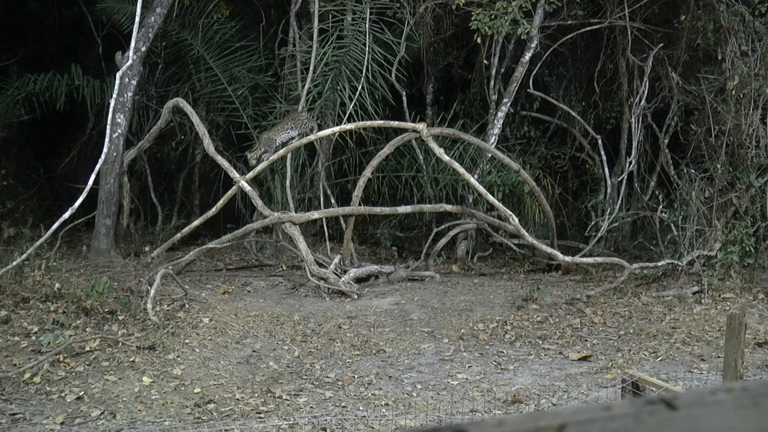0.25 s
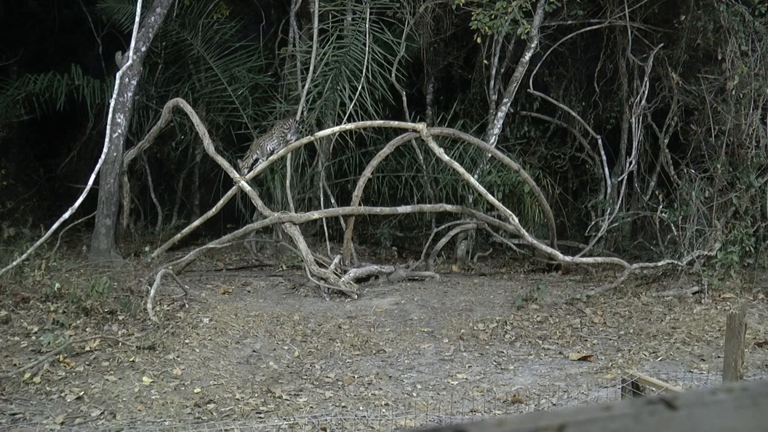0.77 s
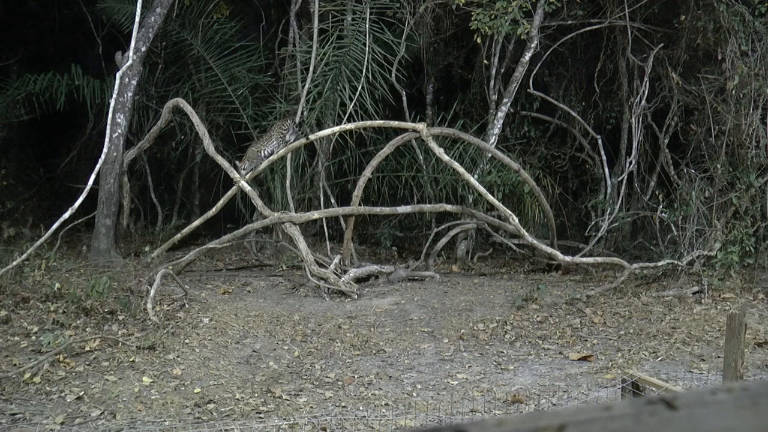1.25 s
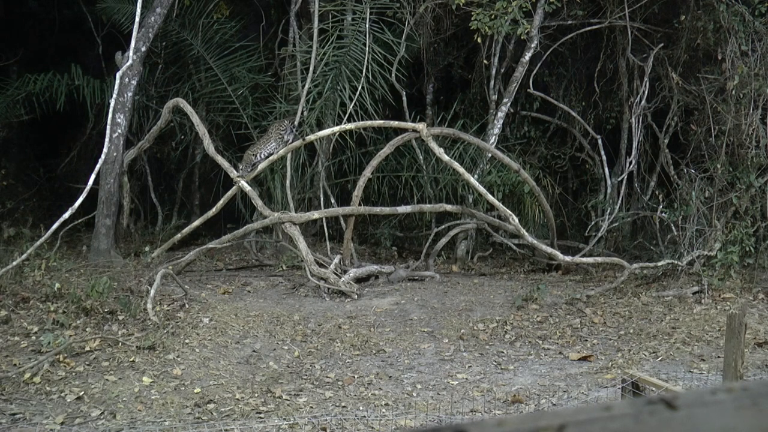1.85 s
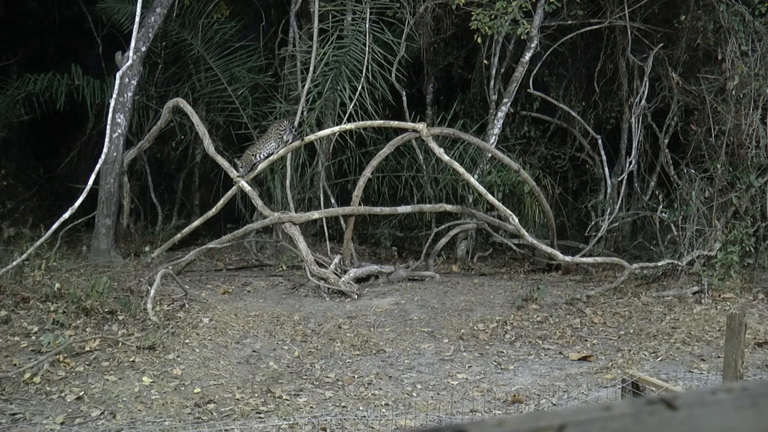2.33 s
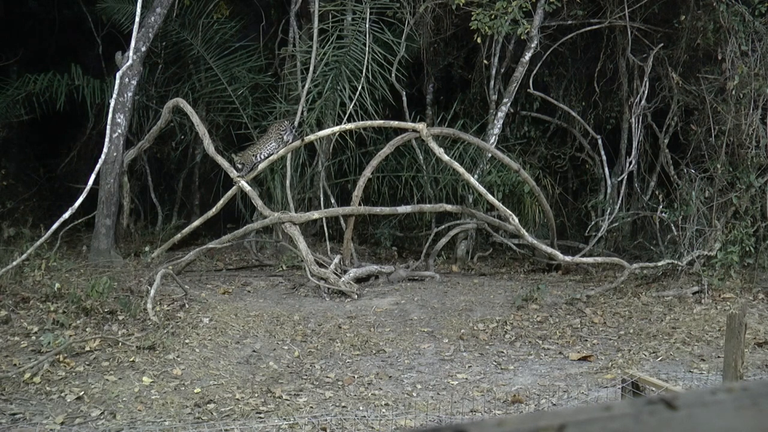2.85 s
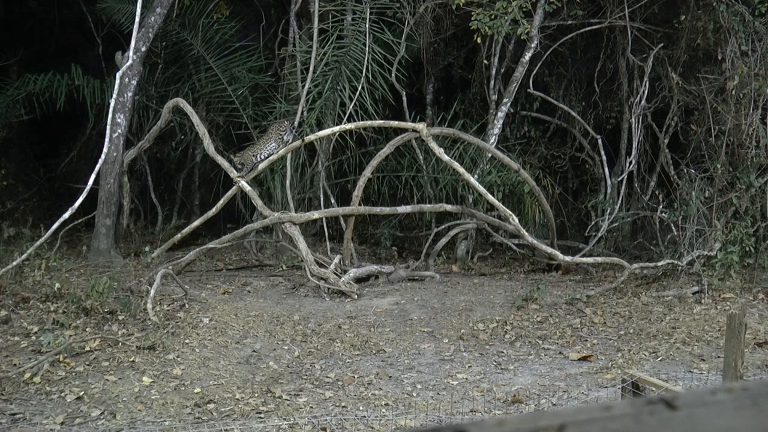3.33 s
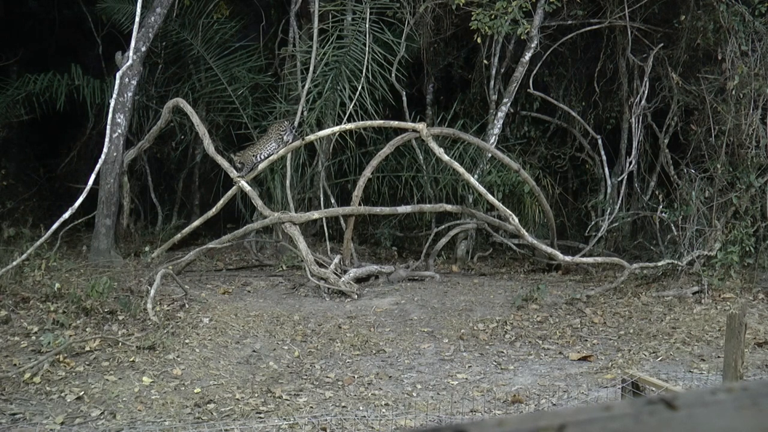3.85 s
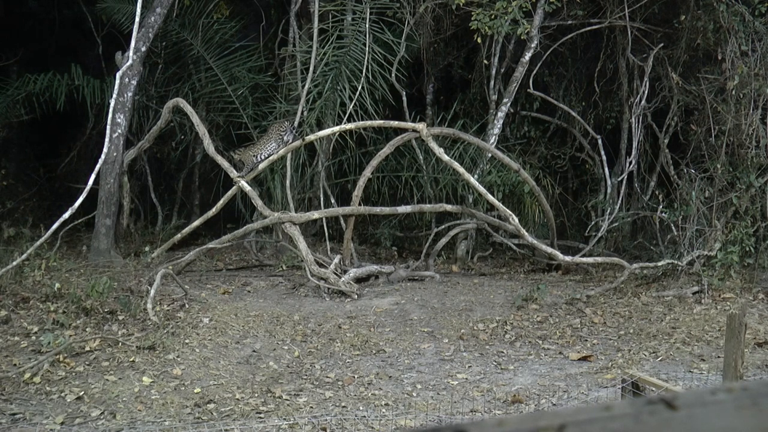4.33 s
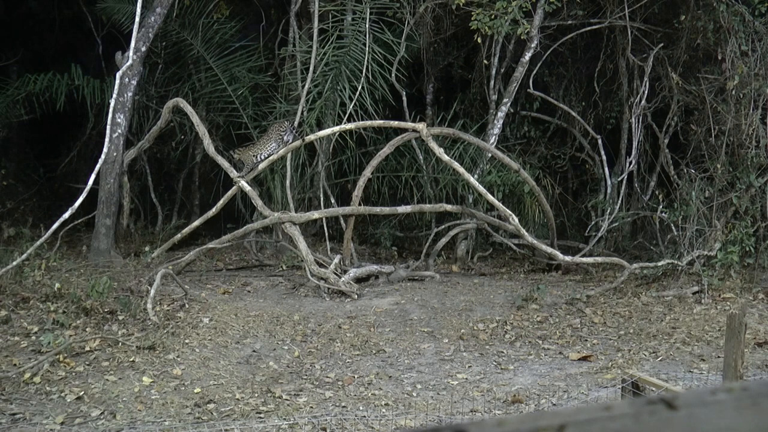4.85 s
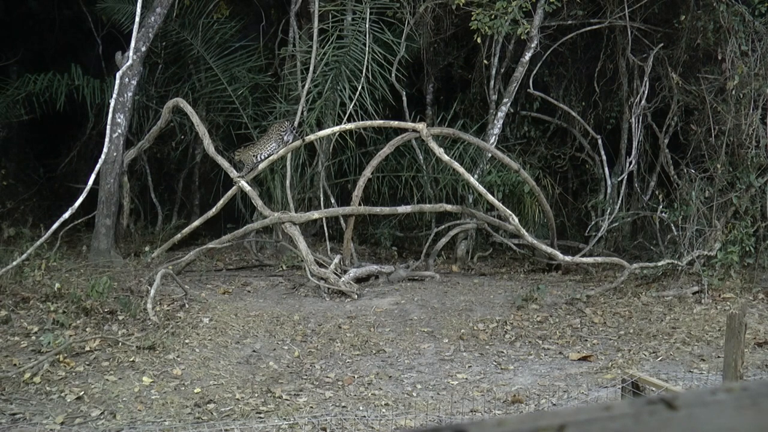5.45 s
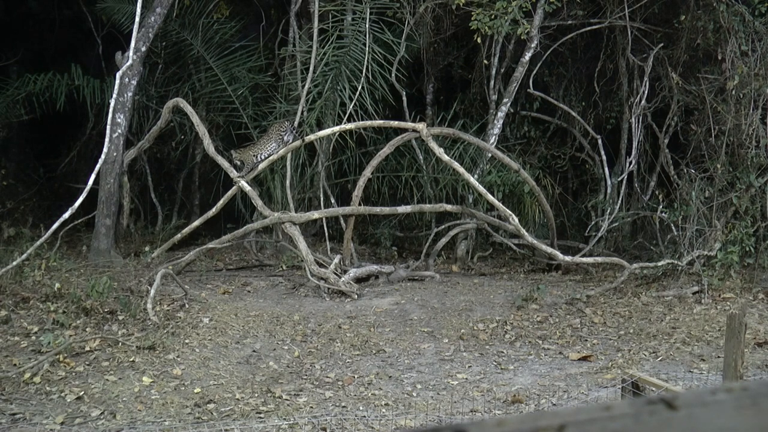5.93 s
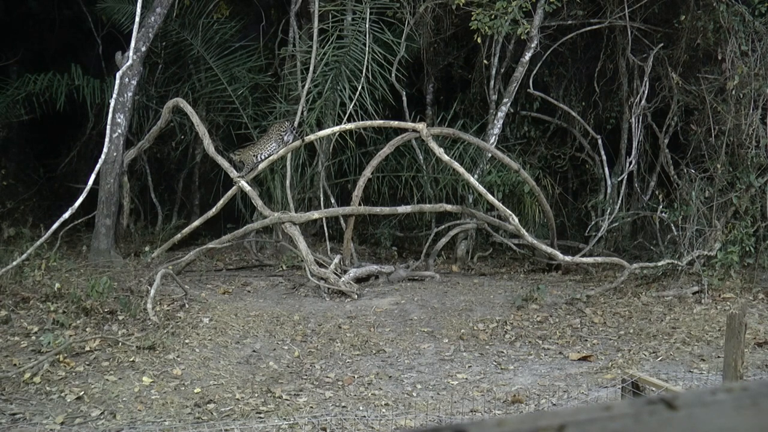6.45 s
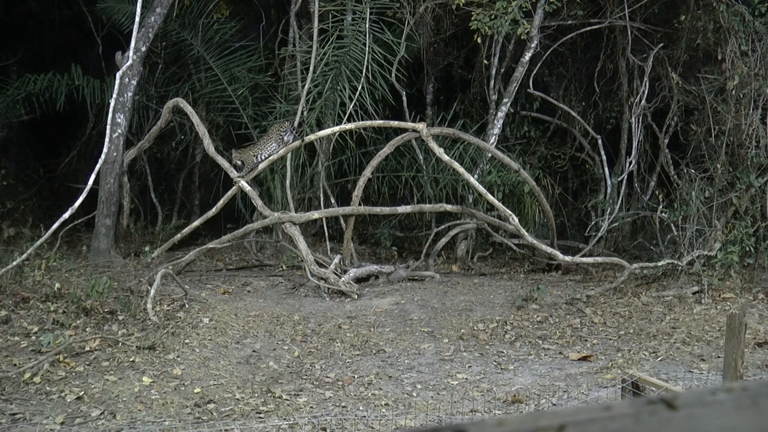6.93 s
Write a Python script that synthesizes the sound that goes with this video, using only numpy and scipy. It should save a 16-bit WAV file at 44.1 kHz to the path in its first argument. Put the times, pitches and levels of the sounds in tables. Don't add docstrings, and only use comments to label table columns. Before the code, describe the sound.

Night woodland heard from a handled camera. A continuous piercing cricket trill sits over a faint insect hum and soft air. Fabric rubs and light clicks open, a faint rising bird whistle follows, then the plastic case cracks sharply around three seconds. After four seconds come brief katydid buzzes, small scrapes and knocks; late on the bird whistles again and dull bumps accompany more cloth.

```python
import sys
import numpy as np
from scipy import signal
from scipy.io import wavfile
from scipy.ndimage import uniform_filter1d

SR = 44100
rng = np.random.default_rng(int(sys.argv[2]) if len(sys.argv) > 2 else 0)


def generate_wav(signal):
    frames = np.transpose(np.atleast_2d(signal))
    scaled = np.clip(frames, -1, 1) * 32767
    pcm = np.round(scaled).astype(np.int16)
    wavfile.write(sys.argv[1], SR, pcm)


def convert_level_to_amplitude(level_db):
    exponent = np.asarray(level_db, float) / 20
    return 10 ** exponent


N = 316638

# f/Hz, level/dB
AIR = [(12, -53), (20, -6), (43, -15), (87, -2.5), (180, -3), (300, 0.5), (499, -9.5), (721, -9),
       (831, -7.5), (902, -36), (1080, -13), (1270, -23), (1700, -11), (2400, -12), (2600, -21),
       (3380, -36), (5720, -120)]
HISS = [(1200, -34), (2200, -33), (3000, -5), (3700, -20), (5000, -1), (7400, -17), (8600, 12), (9020, 4),
        (9080, -14), (9230, -9), (9400, -5.5), (9600, -11.5), (9780, -12), (12000, -23), (16000, -18.5)]
# f/Hz, likeness (1 = same)
EAR_LIKENESS = [(60, 0.28), (130, 0.27), (290, 0.43), (640, 0.61), (1410, 0.5), (3100, 0.78), (6820, 1),
                (15000, 0.066)]
# t/s, lead/chirps
CRICKET_LEAD = [(0, 0.071), (.5, 0.089), (1, 0.12), (2, .18), (2.5, .17), (3.6, 0.089), (4, 0.11),
                (4.5, .16), (6.5, 0.16), (7.2, 0.2)]
# f/Hz, left/dB, right/dB, right ear's lead/rad
TRUNK_ECHOES = [(8063, -20, -19, -0.1), (8091, -19, -20, -0.2), (8122, -15, -15, -0.1),
                (8154, -15, -17, -0.3), (8211, -11, -14, -0.3), (8266, -17, -18, -0.7),
                (8293, -15, -13, -0.2), (8328, -10, -14, -0.4), (8349, -9, -16, 0.0), (8421, -4, -2, -0.2),
                (8452, -7, -7, -0.1), (8471, -8, -8, 0.0), (8500, -6, -6, -0.4), (8546, -4, -4, -0.1),
                (8581, -6, -10, 0.1), (8600, -3, -3, -0.3), (8663, -7, -7, -0.2), (8699, -11, -13, -0.9),
                (8729, -6, -8, 0.3), (8765, 3, 1, -1.0), (8800, -13, -10, -1.3), (8821, -4, -11, -1.4),
                (8847, -7, -8, -0.6), (8876, 2, -4, -0.6), (8901, 0, -4, -0.1), (8970, -9, -8, -0.6),
                (9006, -6, -8, -0.3), (9029, -13, -16, -0.3)]
# t/s, level/dB
SHIMMER_CHANGES = [(0.0, 1.5), (0.46, -7), (0.68, -3), (0.98, -6), (1.42, -5), (1.78, -4), (1.99, -4),
                   (3.0, -1), (3.1, 7), (3.17, -7), (3.3, -6), (4.06, -7), (5.56, -3), (6.28, -2.5), (6.66, -3)]
CHIRP_THROBS = [(1, .286, 1.0), (2, .27, -1.5), (3, .2, .15), (4, .13, -2.27), (6, .36, -.2),
                (10, .16, -1.6)]
# f/Hz, width/Hz, pulse rate/Hz, level/dB
CHORUS_VOICES = [(2628, 110, 83, -75.5), (2960, 220, 78, -65.5), (3056, 240, 57, -65), (3230, 52, 110, -68),
                 (3256, 82, 86, -66), (3317, 59, 40, -65), (3353, 160, 120, -66.5), (4550, 250, 70, -73.5),
                 (4890, 240, 110, -70), (6986, 190, 83, -76)]
# start/s, end/s, level/dB, brightness/dB
CLOTH_STROKES = [(0.05, 0.196, -65.5, -3), (0.264, 0.395, -67, 7.5), (0.79, 1.15, -68, -4),
                 (1.293, 1.46, -79, 7), (1.936, 2.192, -73, -4), (2.405, 2.667, -64.5, -3.5),
                 (2.732, 3.085, -66, -6.5), (3.303, 3.624, -61, -3.5), (4.05, 4.352, -89, 16),
                 (4.415, 4.62, -75, 8), (4.814, 5.413, -78, -5), (5.438, 5.657, -69.5, -3),
                 (5.735, 5.86, -66.5, 3), (5.838, 6.285, -81, -16.5), (6.237, 6.702, -72.5, -10),
                 (6.828, 7.002, -66.5, -4), (7.066, 7.302, -62, 1.5)]
# low/Hz, high/Hz, level/dB, share of brightness, side share
CLOTH_RANGES = [
    (120, 770, -5, -0.55, 0.49),
    (980, 3090, -2.5, -1, 0.32),
    (3750, 7550, 5, 0.67, 0.084),
    (9050, 13100, -6, 0.97, 1),
]
# t/s, peak/dB, f/Hz, t60/s (t60 = time to fade by 60 dB)
TAPS = [(.0654, -55, 2200, .012), (0.096, -57, 1440, 0.11), (.109, -50, 6500, .012),
        (2.0572, -41, 2520, .012), (2.977, -37, 1150, 0.014), (2.8972, -32, 2700, 0.006),
        (3.3355, -47, 1200, .015), (3.489, -53, 290, 0.044), (3.503, -50, 2300, .02),
        (3.552, -46, 290, .05), (3.553, -45.5, 1650, .03), (3.606, -50, 1700, .02), (3.607, -53, 2300, .02),
        (4.106, -54, 1950, .02), (4.262, -51.5, 1410, 0.036), (4.274, -50, 1780, 0.033),
        (4.345, -63, 2150, .02), (4.412, -57, 1900, .02), (4.598, -58, 2000, .02), (4.659, -54, 1970, .02),
        (2.114, -55, 1450, 0.066), (.1695, -44, 5250, .014), (2.8975, -33, 960, .012),
        (2.9765, -32, 900, .008), (2.9762, -22, 3300, .004), (5.396, -46, 5100, 0.017),
        (5.185, -46, 2600, 0.013), (5.788, -54, 12000, .01), (5.788, -62, 12800, .01),
        (5.799, -62, 14700, .01), (5.825, -54.5, 336, .06), (6.235, -56, 570, .05), (5.31, -59, 750, .06),
        (2.7045, -47, 1050, .02), (3.555, -51, 560, 0.047), (3.565, -55, 730, .04), (3.371, -50, 600, .03),
        (2.534, -64, 1600, .2), (2.9775, -28, 1660, 0.011),
        (.1455, -44, 4900, .01), (.159, -45, 5300, .012), (.0895, -50, 5600, .012),
         (.121, -48, 5200, .012), (.1685, -47, 2000, .012), (.123, -45, 2600, .02),
         (2.7035, -45, 2050, .012), (2.7035, -46, 760, .016), (2.909, -37, 400, .025),
         (2.909, -42, 900, .02), (2.928, -44, 290, .04), (3.371, -45, 1700, .014),
         (3.4386, -48, 1750, .014), (3.4386, -50, 2250, .014), (3.579, -43, 2500, .012),
         (3.335, -38, 260, .04), (3.384, -47, 230, .03), (4.259, -53, 810, .04), (4.316, -53, 640, .04),
         (5.29, -53, 1750, .03), (5.357, -57, 1750, .025), (5.398, -55, 1900, .025),
         (5.557, -55, 1080, .03), (5.557, -57, 1750, .025), (5.135, -55, 420, .05), (3.012, -47, 290, .04),
         (.2345, -56, 2000, .02)]
# t/s, peak/dB, f/Hz, t60/s
BUTTON_CLICK = [(.289, -33, 2450, .011), (.2905, -38, 4810, .009), (.2905, -39, 4020, .009),
                (.2905, -46, 6450, .008), (.29, -43, 8890, .006), (.289, -42, 1900, .01),
                (.297, -44, 7800, .008), (.2975, -48, 4300, .008), (.29, -60, 640, .015)]
# t/s, peak/dB, f/Hz, t60/s
CRACK = [(2.9736, -28, 2500, .004), (2.9761, -3.5, 2150, .0023), (2.9761, -26, 6300, .002),
         (2.976, -24, 310, .022), (2.9765, -29, 700, .012), (2.896, -23, 290, .03),
         (2.897, -30, 1640, .022), (2.7038, -41, 1400, .008), (3.333, -31, 720, .022),
         (3.334, -44, 205, .05)]
# t/s, peak/dB, f/Hz
BUMPS = [(1.368, -50.5, 300), (1.524, -53, 297), (1.635, -50, 270), (2.06, -47.5, 286),
         (2.7033, -35.5, 284), (2.8962, -34, 397), (2.998, -40.5, 285), (3.361, -45, 295),
         (3.521, -43.5, 300), (4.315, -41.5, 324), (6.59, -54.5, 355), (6.825, -38, 201), (6.905, -40, 167),
         (6.978, -38, 172), (7.056, -44, 180), (7.115, -34, 169), (7.139, -44.5, 253)]
# f/Hz, level/dB, t60/s
HOLLOW_CASE = [(604, 7.5, 0.021), (762, -6.5, 0.083), (915, -12, 0.07), (1090, -13, 0.092),
               (1225, -10, 0.041), (1470, -16, 0.04)]
# t/s, peak/dB, snap/dB
TICKS = [(0.088, -50.5, 11), (0.1591, -53, 14.5), (0.29, -42, 14), (0.2977, -49, 16), (2.0093, -66, 17),
         (2.469, -50, -6), (2.8114, -59, 18), (2.849, -47, -3), (2.8868, -57.5, 17.5), (3.416, -58, 7),
         (4.1045, -57, 12), (5.4034, -56, -2), (5.533, -63, 13), (5.739, -60, 16), (5.7894, -60, 17),
         (5.8, -53, 8), (6.289, -57, 5), (6.3068, -49, 8.5), (6.3277, -50.5, 7), (6.385, -51, 10),
         (6.6794, -67, 6), (6.7694, -67, 8), (6.851, -61, 19), (6.8994, -63, 10), (7.1172, -66, 14)]
# t/s, peak/dB, weight/dB, snap/dB
KNOCKS = [(0.119, -45.5, -13, -6), (0.1347, -52, -28, -4), (0.147, -53, -20, -7), (0.1704, -51, -25, -4),
          (0.9321, -50, -9.5, -4), (2.0569, -51, -10, -8), (2.1134, -48, -12, -15),
          (2.7037, -49.5, 2.5, -14), (2.8964, -35.5, -3, -21), (2.9078, -56, 6, -14),
          (3.3334, -42, -4, 6.5), (3.3703, -44, -3, -4), (3.4396, -54, -4, -8), (3.5533, -46.5, -11, -11),
          (3.5792, -42, -32, -17), (4.261, -47, -19, -21), (4.4591, -47, -15, -2), (4.9135, -46.5, -18, -8),
          (4.955, -49, -24, -2), (5.185, -54, -3, -4), (5.2945, -51.5, -8, -9), (5.3302, -52, -10, -11),
          (5.56, -57, 1, -4), (6.5056, -53, -24, -8)]
# f/Hz, width/Hz, level/dB
SHELL_RINGS = [(1442, 38, -2), (1785, 50, 3), (2120, 46, 0), (2606, 98, 0), (3670, 120, -5.5),
               (4500, 60, -4), (5050, 74, 2), (5300, 110, -15)]
# start/s, end/s, level/dB, slip rate/Hz
STUTTERS = [(.116, 0.143, -51.5, 300), (0.141, 0.165, -51.5, 300), (.167, .186, -58, 300),
            (4.454, 4.505, -50.5, 420), (4.499, 4.527, -58, 420), (4.905, 4.97, -70, 420)]
# t/s, f/Hz, length/s, level/dB
PEEPS = [(0.316, 6660, 0.13, -65), (.7, 6200, 0.12, -61), (0.99, 6670, 0.059, -55),
         (1.52, 6340, 0.098, -62), (1.704, 6600, 0.13, -62), (2.237, 6480, 0.14, -60),
         (2.906, 6500, 0.11, -60), (3.598, 6300, 0.13, -62), (4.007, 6600, 0.1, -62),
         (4.227, 6260, .08, -68), (4.653, 6700, 0.13, -62), (4.91, 6260, .09, -58),
         (5.583, 6560, 0.14, -61), (6.47, 6200, 0.081, -72)]
# start/s, end/s, pulse rate/Hz
RATTLES = [(.33, .76, 102.73), (1.52, 2.04, 102.76), (2.98, 3.3, 102.67), (4.2, 4.48, 102.95),
           (5.45, 5.9, 102.79), (6.73, 7.2, 102.79)]
# multiple, level/dB
VOCAL_SAC = [(25, -85), (26, -74), (27, -71.5), (28, -76), (29, -69), (30, -79)]
# start/s, end/s, first f/Hz, last f/Hz, level/dB
WHISTLES = [
    (1.151, 1.423, 1195, 1225, -69),
    (1.397, 1.55, 1225, 1230, -80),
    (1.92, 2.142, 1206, 1270, -73.5),
    (2.372, 2.63, 1236, 1400, -74),
    (6.295, 6.45, 1393, 1392, -64.5),
    (6.418, 6.782, 1354, 1407, -65),
]
# t/s, peak/dB, f/Hz
JOLTS = [
    (2.974, -51, 70.4),
    (3.334, -64, 60),
    (3.5, -69, 60),
]
# start/s, end/s, last level/dB
BUZZES = [
    (4.242, 4.593, -63),
    (5.431, 5.693, -70.5),
    (6.279, 6.518, -69.5),
]
# start/s, end/s, low/Hz, high/Hz, level/dB
SCRAPES = [ (4.48, 4.523, 4300, 5600, -55), (4.903, 4.973, 3500, 3970, -59),
           (5.075, 5.102, 3860, 4100, -66), (5.133, 5.16, 3860, 4100, -66),
           (5.505, 6.313, 980, 1120, -79.5), (6.851, 7.008, 1010, 1170, -73),
           (7.061, 7.25, 1005, 1160, -70), (6.795, 7.012, 60, 132, -65)]
# f/Hz, width/Hz, depth (0-1)
HOUSING_DIPS = [(496, 59, 1), (1555, 98, 0.97)]
# f/Hz, left minus right/dB
PORTS = [(130, 1.2), (350, -1.3), (700, -2.5), (1300, -2.5), (2200, -0.2), (4400, 0.2), (8500, 0.2),
         (14000, 0.5)]


def evened(x):
    return x / np.sqrt(np.mean(x ** 2) + 1e-20)


def read(points, hz):
    f, value = np.transpose(points)
    return np.interp(np.log(hz + 1), np.log(f + 1), value)


def add(mix, s, sound):
    part = mix[round(s * SR):][:len(sound)]
    part += sound[:len(part)]


def band(x, lo_hz, hi_hz):
    return signal.sosfilt(signal.butter(4, [lo_hz, hi_hz], "band", fs=SR, output="sos"), x)


def ring(x, hz, width, turn=0):
    r, w = np.exp(-np.pi * width / SR), 2 * np.pi * hz / SR
    zeros = 2 * (1 - r) * np.array([np.cos(turn), -r * np.cos(turn - w)])
    return signal.lfilter(zeros, [1, -2 * r * np.cos(w), r * r], x)


def shell(x):
    return sum((-1) ** k * convert_level_to_amplitude(db) * ring(x, hz, width) for k, (hz, width, db) in enumerate(SHELL_RINGS))


def wander(per_s):
    knots = rng.standard_normal(1300)
    curve = np.interp(np.arange(N) * per_s / SR, np.arange(1300), knots)
    return evened(uniform_filter1d(curve, 100))


def pulses(per_s, jitter):
    turns = np.cumsum(per_s * (1 + jitter * wander(40))) / SR
    return np.diff(np.floor(turns), prepend=0)


def forest(x, t60, wet_db):
    t = np.arange(SR // 5) / SR
    taps = rng.standard_normal((2, len(t))) * (rng.random((2, len(t))) < .3) * convert_level_to_amplitude(-60 * t / t60)
    taps *= convert_level_to_amplitude(wet_db) / np.linalg.norm(taps, axis=1, keepdims=True)
    return x + signal.fftconvolve(x[None], taps, axes=1)[:, :N]


def night_air(spectrum, db, patchy_db):
    hz = np.fft.rfftfreq(2048, 1 / SR)
    a, b, c, d, patches = rng.standard_normal((N // 512 + 5, len(hz), 5)).T
    patches = evened(uniform_filter1d(uniform_filter1d(patches, 20, 0), 8, 1))
    same = np.clip(read(EAR_LIKENESS, hz), -1, 1)[:, None]
    left = a + 1j * b
    right = same * left + np.sqrt(1 - same ** 2) * (c + 1j * d)
    z = np.array([left, right]) * convert_level_to_amplitude(read(spectrum, hz)[:, None] + patchy_db * patches)
    return convert_level_to_amplitude(db) * evened(signal.istft(z, nperseg=2048, noverlap=1536)[1][:, :N])


def near_cricket(start=.46, stroke=0.6015, high_hz=9100, low_hz=7950, slip=0.13, carry=.47, stray=.27,
                 width=10.2, twist=3.1):
    chirps_per_s, wing_hz = 29.71, 8700
    change_s, shimmer_db = 0.075, 3.5
    t = np.arange(N) / SR
    drift = np.interp(t, *np.transpose(CRICKET_LEAD))
    turns = chirps_per_s * t + drift - start + 1
    count, u = turns.astype(int), turns % 1 / stroke
    slips, size = rng.standard_normal((300, 2)).T
    slow_slips = evened(uniform_filter1d(slips[::-1], size=7))
    cycles = stroke / chirps_per_s * (high_hz * u - (high_hz - low_hz) * u ** 2 / 2)
    cycles += np.cumsum(slip * slips + stray * slow_slips)[count]
    cycles += carry * count - wing_hz / chirps_per_s * drift[np.searchsorted(count, count)]
    swell = np.sin(np.pi * np.minimum(u, 1)) ** 0.24
    song = np.sin(2 * np.pi * cycles) * swell * convert_level_to_amplitude(0.55 * size[count])

    change_db = sum(db * np.maximum(1 - abs(t - s) / change_s / 2, 0) for s, db in SHIMMER_CHANGES)
    shimmer = convert_level_to_amplitude(shimmer_db + change_db)
    heard = np.zeros((2, N))
    for k, (hz, left_db, right_db, lead) in enumerate(TRUNK_ECHOES):
        path = song * (shimmer if 8860 < hz < 8930 else 1)
        left = convert_level_to_amplitude(left_db) * ring(path, hz, width, k * twist)
        right = convert_level_to_amplitude(right_db) * ring(path, hz, width, k * twist + 1.7 * lead)
        heard += [left, right]
    heard *= 1 + sum(depth * np.cos(2 * np.pi * k * (turns + start) + lag) for k, depth, lag in CHIRP_THROBS)
    heard = signal.sosfilt(signal.ellip(8, .5, 30, 9040, fs=SR, output="sos"), heard)
    return evened(band(heard, 8070, 9240)) * convert_level_to_amplitude(-53.27)


def far_chorus(blur=0.44):
    out = np.zeros(N)
    for hz, width, per_s, db in CHORUS_VOICES:
        drive = evened(pulses(per_s, .06)) * (1 - blur) + blur * rng.standard_normal(N)
        out += convert_level_to_amplitude(db + 0.35 * wander(9.4)) * evened(ring(ring(drive, hz, width), hz, width))
    return forest(out, 0.31, -7.5) * convert_level_to_amplitude([[.6], [-.6]])


def cloth_rustle(grains_per_s=3000, spread_db=2.5):
    stir_db, stir_rise_db_per_s, soft_ends = -78, 1.15, 0.39
    grain_size = convert_level_to_amplitude(spread_db * np.minimum(rng.exponential(1, N), 4))
    grains = rng.standard_normal((2, N)) * grain_size * (rng.random(N) < grains_per_s / SR)
    grains *= convert_level_to_amplitude(1.6 * wander(45))
    out = np.zeros((2, N))
    for lo_hz, hi_hz, range_db, share, wide in CLOTH_RANGES:
        level = convert_level_to_amplitude(stir_db + stir_rise_db_per_s * np.arange(N) / SR)
        for t0, t1, db, bright_db in CLOTH_STROKES:
            swell = signal.windows.tukey(round((t1 - t0) * SR), soft_ends)
            add(level, t0, convert_level_to_amplitude(db + share * bright_db) * swell)
        mid, side = evened(band(grains, lo_hz, hi_hz)) * level * convert_level_to_amplitude(range_db - 5.0 + 2.1 * wander(30))
        out += [mid + wide * side, mid - wide * side]
    return out


def handling():
    hits = band(taps_and_bumps() + knocks_and_ticks(), 161, 16000)
    return forest(band(hits + scrapes() + fingernail(), 55, 18000), .06, -14)


def taps_and_bumps():
    out, t = np.zeros(N), np.arange(5000) / SR
    bumps = [(*row, 0.045) for row in BUMPS]
    case_s, case_db = 2.8975, -33.5
    case = [(case_s, case_db + db, hz, t60) for hz, db, t60 in HOLLOW_CASE]
    for s, db, hz, t60 in bumps + CRACK + BUTTON_CLICK + TAPS + case:
        soft_start = 1 - np.exp(-t * hz / .45)
        add(out, s, convert_level_to_amplitude(db - 60 * t / t60) * soft_start * np.sin(2 * np.pi * hz * t))
    return out


def knocks_and_ticks():
    knock_t60, tick_t60, body_t60 = .03, .019, .05
    tick_weight_db, shell_ring_db, fizz_db = -9.5, 9, -15
    out, t = np.zeros(N), np.arange(5000) / SR
    hits = [(*row, knock_t60) for row in KNOCKS]
    hits += [(s, db, tick_weight_db, snap_db, tick_t60) for s, db, snap_db in TICKS]
    s, db, weight_db, snap_db, t60 = np.transpose(hits)[:, :, None]
    noise = rng.standard_normal((len(hits), len(t)))
    bursts = noise * convert_level_to_amplitude(-60 * t / t60)
    bodies = noise * convert_level_to_amplitude(-60 * t / body_t60)
    ringing = bursts + convert_level_to_amplitude(shell_ring_db) * shell(bursts)
    parts = [(band(bodies, 187, 690), weight_db),
             (band(bodies, 670, 1670), weight_db - 19),
             (band(ringing, 1520, 3360), 0),
             (band(bursts, 3970, 9000), snap_db),
             (band(bursts, 12300, 16000), fizz_db + snap_db)]
    sounds = sum(convert_level_to_amplitude(db + rel_db) * p / abs(p).max(1, keepdims=True) for p, rel_db in parts)
    for start, sound in zip(s[:, 0], sounds):
        add(out, start, sound)
    return out


def fingernail():
    out = np.zeros(N)
    for t0, t1, db, per_s in STUTTERS:
        luck, size = rng.random(5000), rng.standard_normal(5000)
        slips = (size * (0.085 + (luck < per_s / SR)))[:round((t1 - t0) * SR)]
        sound = shell(slips) + convert_level_to_amplitude(-17.5) * band(slips, 1620, 4300)
        add(out, t0, convert_level_to_amplitude(db) * evened(sound) * signal.windows.tukey(len(slips), .2))
    return out


def peeps():
    out = np.zeros(N)
    for s, hz, length, db in PEEPS:
        noise = rng.standard_normal(6000)[:round(length * SR)]
        tone = evened(ring(ring(noise, hz, 260), hz, 260))
        add(out, s, convert_level_to_amplitude(db - 7.5) * tone * np.hanning(len(noise)) ** .5)
    return out


def frog_rattle():
    swell_db = 1.0
    out, swells = np.zeros(N), [wander(9.4) for line in VOCAL_SAC]
    for t0, t1, per_s in RATTLES:
        t = np.arange(0, min(t1, N / SR - .001) - t0, 1 / SR)
        lines = np.zeros(len(t))
        for (k, db), swell in zip(VOCAL_SAC, swells):
            level = convert_level_to_amplitude(db + swell_db * swell[round(t0 * SR):][:len(t)])
            lines += level * np.cos(2 * np.pi * k * per_s * t + k * k)
        add(out, t0, np.sqrt(2) * lines * signal.windows.tukey(len(t), .25))
    return out * convert_level_to_amplitude([[1.2], [-1.2]])


def bird_whistles():
    level_climb_hz, swell_db_per_hz = 75, .22
    glide_hz_per_s, waver_hz = 480, 7
    out, flutter = np.zeros(N), wander(25)
    for t0, t1, first_hz, last_hz, db in WHISTLES:
        t = np.arange(0, t1 - t0, 1 / SR)
        hz = np.minimum(first_hz + glide_hz_per_s * t, last_hz)
        swell_db = swell_db_per_hz * (last_hz - first_hz - level_climb_hz) * (t / t[-1] - .5)
        tone = np.sqrt(2) * np.sin(2 * np.pi * np.cumsum(hz + waver_hz * flutter[-len(t):]) / SR)
        level = convert_level_to_amplitude(db - 7.5 + swell_db + 2.7 * flutter[round(t0 * SR):][:len(t)])
        add(out, t0, level * tone * signal.windows.tukey(len(t), .4))
    return out


def jolts():
    out, t = np.zeros(N), np.arange(4000) / SR
    for s, db, hz in JOLTS:
        add(out, s, convert_level_to_amplitude(db) * np.exp(-t * hz * .9) * np.sin(2 * np.pi * hz * t))
    return out * convert_level_to_amplitude([[-5], [5]])


def katydid_buzzes():
    scrapes_per_s, swell_db_per_s = 145.5, 22
    overtone_hz, sag_hz_per_s = 10700, 1800
    out = np.zeros(N)
    for t0, t1, db in BUZZES:
        t = np.arange(t0, t1, 1 / SR)
        beat = t * scrapes_per_s
        clicks = 10.5 * (np.diff(beat % 1, prepend=0) < 0)
        scrape = clicks + np.exp(-(beat % 1) / 0.3) * rng.standard_normal(SR)[:len(t)]
        sink = np.cos(np.pi * sag_hz_per_s * (t - t0) ** 2 + 2 * np.pi * (16000 - overtone_hz) * (t - t0))
        overtone = band(sink * ring(ring(scrape, 15800, 1500), 15800, 1500), 9300, 12500)
        wings = ring(ring(scrape, 5250, 550), 5010, 500)
        wings += 0.46 * ring(ring(scrape, 5720, 300), 5720, 300) + convert_level_to_amplitude(-11.5) * overtone
        level = convert_level_to_amplitude(db + 7.5 - swell_db_per_s * (t1 - t))
        add(out, t0, level * evened(wings) * signal.windows.tukey(len(t), .15))
    return out


def scrapes():
    out, grain_db = np.zeros(N), 3
    for t0, t1, lo_hz, hi_hz, db in SCRAPES:
        grains = (rng.standard_normal(SR) * convert_level_to_amplitude(grain_db * wander(250)[:SR]))[:round((t1 - t0) * SR)]
        sound = evened(band(grains, lo_hz, hi_hz))
        add(out, t0, convert_level_to_amplitude(db + 0.5) * sound * signal.windows.tukey(len(grains), .45))
    return out


def scene():
    callers = forest(peeps() + bird_whistles() + katydid_buzzes(), 0.22, -12.0)
    far = near_cricket() + far_chorus() + frog_rattle() + callers
    near = cloth_rustle() + handling() * convert_level_to_amplitude([[-0.3], [0.3]])
    for hz, width, depth in HOUSING_DIPS:
        near = near - depth * ring(near, hz, width)
    air = night_air(AIR, -67.0, 2.23) + night_air(HISS, -56, 2.5)
    return far + near + jolts() + air


def roll_off(x):
    return signal.sosfilt(signal.butter(12, 16420, fs=SR, output="sos"), x)


def record(dry):
    hz = np.linspace(0, SR / 2, 513)
    ports = [signal.firwin2(511, hz, convert_level_to_amplitude(way * read(PORTS, hz) / 2), fs=SR) for way in (1, -1)]
    coloured = signal.oaconvolve(dry, ports, "same", axes=1)
    limited = signal.oaconvolve(coloured, signal.firwin(401, 15760, fs=SR)[None], "same")
    return roll_off(limited)


dry = scene()
out = record(dry)
generate_wav(out)
```